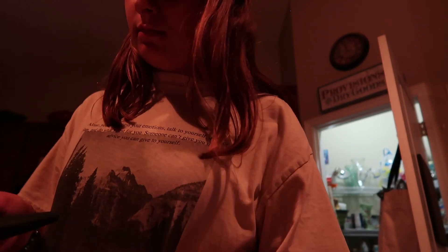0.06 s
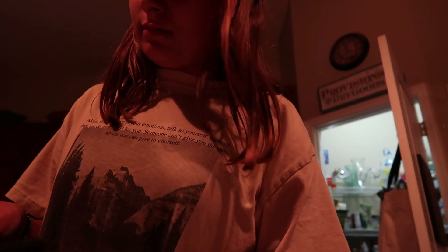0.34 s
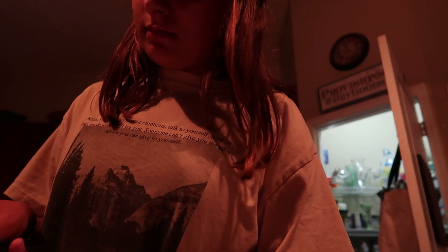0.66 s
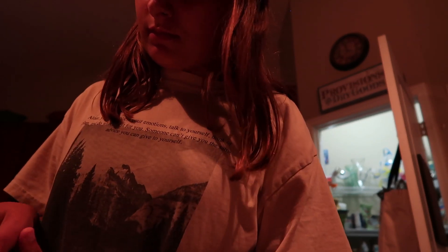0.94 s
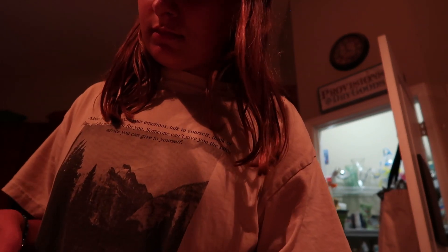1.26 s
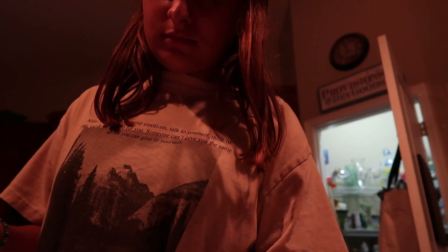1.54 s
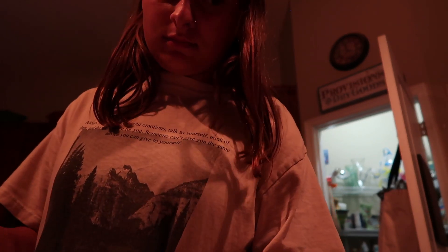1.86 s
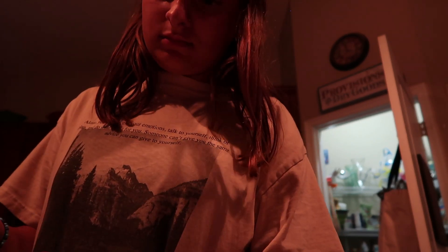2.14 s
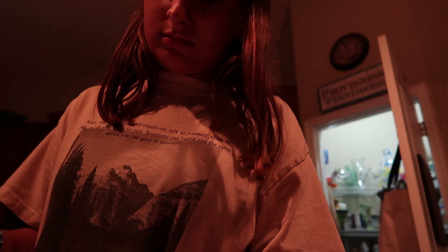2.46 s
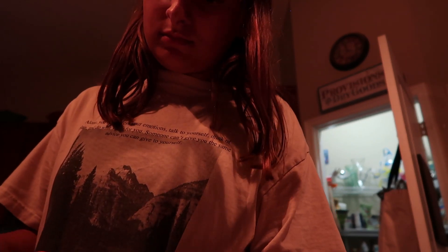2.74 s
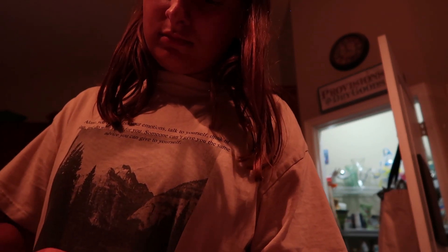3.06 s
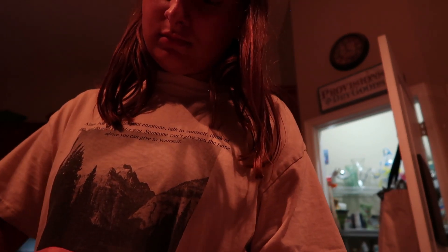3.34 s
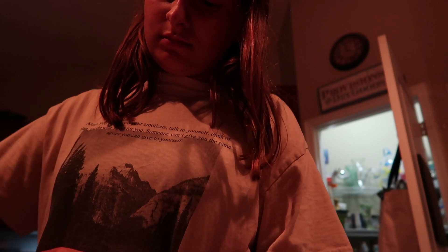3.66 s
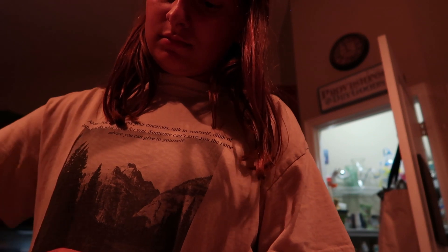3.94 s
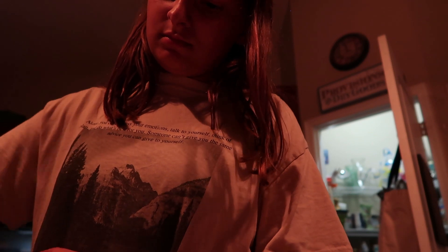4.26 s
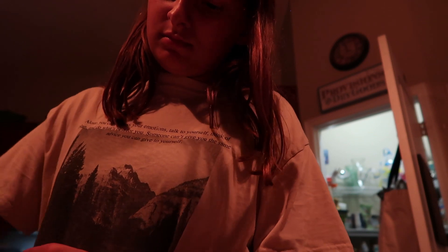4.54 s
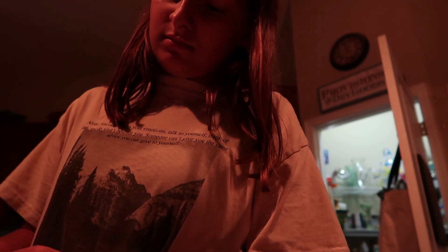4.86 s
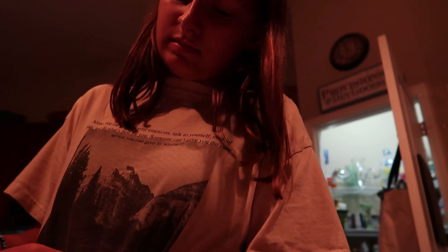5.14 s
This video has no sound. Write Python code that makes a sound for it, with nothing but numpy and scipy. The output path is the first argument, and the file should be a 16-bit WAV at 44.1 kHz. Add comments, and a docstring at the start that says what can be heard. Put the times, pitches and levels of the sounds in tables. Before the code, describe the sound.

A hand can opener grinds unevenly around a tin, with gritty squeaks, metal clicks and sharp knocks on a counter over a faint appliance hum.

```python
"""A small, hard kitchen with an appliance humming: close by, a hand can opener works round a tin on the counter.
Each squeeze drags the cutting wheel along the rim with a gritty scrape and stick-slip squeaks.
The tin judders, rocks and drops back, and the counter booms under it. The steel jaws click on the rim
and once snap shut with a rattle. The walls answer briefly; a limiter ducks after the hardest knocks."""
import sys
import numpy as np
from scipy import signal
from scipy.fft import rfft, irfft
from scipy.io import wavfile
from scipy.ndimage import uniform_filter1d

SR = 44100
rng = np.random.default_rng(int(sys.argv[2]) if len(sys.argv) > 2 else 0)


def unload_wav(signal):
    """Save mono or channel-first audio to the path in sys.argv[1] as 16-bit WAV at rate SR, clipped to [-1, 1]."""
    wavfile.write(
        sys.argv[1],
        SR,
        np.round(np.clip(np.atleast_2d(signal).T, -1, 1) * 32767).astype(np.int16),
    )


N = 233818
TIME = np.arange(N) / SR
TAIL = TIME[:SR * 3 // 4]  # time axis of one hit and its ring-out


def undb(db):
    """Decibels to gain."""
    return 10 ** (np.asarray(db) / 20)


def unit(x):
    """Scale to rms 1."""
    return x / np.sqrt(np.mean(x ** 2) + 1e-18)


def burst(x):
    """Scale a transient to the energy of 10 ms at rms 1."""
    return x / np.sqrt(np.sum(x ** 2) / (SR / 100))


def along(points, hz):
    """Read a curve of (freq_hz, value) points on a log-frequency axis."""
    freq_hz, value = np.transpose(points)
    return np.interp(np.log(np.maximum(hz, 1)), np.log(freq_hz), value)


def colour(x, eq):
    """Shape a sound with an EQ curve."""
    size = x.shape[-1]
    return irfft(rfft(x) * undb(along(eq, np.fft.rfftfreq(size, 1 / SR))), size)


def impulse(eq, size=2048):
    """The tightest click with this spectrum: a minimum-phase pulse."""
    cepstrum = irfft(np.log(undb(along(eq, np.fft.rfftfreq(size, 1 / SR)))))
    cepstrum[1:size // 2] *= 2
    cepstrum[size // 2 + 1:] = 0
    pulse = irfft(np.exp(rfft(cepstrum)))
    return burst(np.pad(pulse, (0, len(TAIL) - size)))


def fade(t60_s):
    """Exponential decay, 60 dB down after t60_s."""
    return np.exp(-np.log(1000) * TAIL / t60_s)


def ring(modes, scatter_db=1.5):
    """Damped modes; each blow lands elsewhere and weights them anew."""
    pitch_hz, level_db, t60_s = np.transpose(modes)[:, :, None]
    weight = undb(level_db + scatter_db * rng.standard_normal(pitch_hz.shape))
    return burst(np.sum(weight * fade(t60_s) * np.sin(2 * np.pi * pitch_hz * TAIL), axis=0))


def ping(hz, cycles=13, overtone=1.4774, overtone_db=-4):
    """A struck part gives a damped note and one overtone."""
    return ring([(hz, 0, cycles / hz), (hz * overtone, overtone_db, cycles / hz / overtone)])


def soften(x, contact_s):
    """The longer a contact lasts, the duller it sounds."""
    push = np.sin(np.pi * TAIL[TAIL < contact_s] / contact_s) ** 2 + 1e-9
    return signal.lfilter(push / push.sum(), 1, x)


def add(track, start_s, sound):
    """Mix a sound into a track at its cue."""
    start = int(start_s * SR)
    part = sound[max(-start, 0):max(N - start, 0)]
    track[max(start, 0):max(start, 0) + len(part)] += part


def stereo_noise(width, size):
    """White noise whose left-right coherence follows a curve."""
    coherence = np.clip(along(width, np.fft.rfftfreq(size, 1 / SR)), -1, 1)
    shares = np.sqrt([(1 + coherence) / 2, (1 - coherence) / 2])
    mid, side = rfft(rng.standard_normal((2, size))) * shares
    return irfft([mid + side, mid - side], size)


# tone of the still air: freq_hz, level_db
AIR_EQ = [(15, -74.5), (25, -30.5), (52, -1), (122, -6), (233, -6.5), (253, -11.5), (289, -7), (331, -9),
          (552, -11), (614, -13), (2300, -21), (2850, -22), (13500, -41), (15500, -73.5)]
# stereo image of the bed, mono in the bass, its hiss unrelated left and right above: freq_hz, coherence
AIR_WIDTH = [(60, 1), (130, 0.712), (290, 0.0067), (700, 0.087), (8000, 0.24)]
# appliance hum: pitch_hz, level_db
HUM_TONES = [(119.5, -58), (150.7, -57.5), (301.5, -70)]


def room_tone(air_db=-52):
    """The bed: still air, soft hiss and an appliance humming."""
    hum = sum(undb(db) * np.sqrt(2) * np.sin(2 * np.pi * (hz * TIME + rng.random()))
              for hz, db in HUM_TONES)
    air = unit(colour(stereo_noise(AIR_WIDTH, N), AIR_EQ))
    return undb(air_db) * air + hum


# how far the right channel trails the left: freq_hz, lag_rad
RIGHT_LAG = [(20, 0), (1000, .08), (2700, .35), (4000, 1.3), (6000, 2.2), (8400, 2.8), (14000, 2.7)]


def pan_left(x, right_db=-3.2):
    """The tin stands to the left, so the right side hears it later and a little weaker."""
    hz = np.fft.rfftfreq(len(x), 1 / SR)
    shadow = undb(along([(150, 0.049), (550, right_db), (3000, right_db), (8000, -0.15)], hz))
    right = irfft(rfft(x) * shadow * np.exp(-1j * along(RIGHT_LAG, hz)), len(x))
    return np.array([x, right])


# reverb time by band: freq_hz, t60_s
ROOM_DECAY = [(150, 0.486), (500, 0.4137), (1200, 0.4494), (2700, 0.4866), (5000, 0.35), (12000, 0.358)]
# stereo image of the tail: freq_hz, coherence
ROOM_WIDTH = [(100, 1), (1400, 0.977), (3100, 0.845), (6500, 0.12), (12000, -0.96)]
# tone of the walls: freq_hz, gain_db
WALL_EQ = [(50, 3), (155, 1.5), (205, -1.5), (270, -0.5), (600, -4), (1300, -4.5), (3000, -3.5),
           (6000, -1.5), (10000, -5), (15000, -7.5)]
# first reflections of the tin: delay_s, level_db
TIN_ECHOES = [(0.0141, 0), (0.0255, -10.5), (0.037, -4.5)]
# first reflections of the snap above it: delay_s, level_db
SNAP_ECHOES = [(0.024, -18.5), (0.024, -8.5), (0.031, -8), (0.034, -25)]


def kitchen_reverb(send, first_echoes, predelay_s=0.00086, build_s=0.0158, diffuse_db=-28.5,
                   early_db=-5, early_t60_s=0.259, echoes_per_s=400):
    """Distinct echoes off cupboards and walls thicken into a short diffuse tail."""
    size = len(TAIL)
    noise = rfft(stereo_noise(ROOM_WIDTH, size))
    hz = np.fft.rfftfreq(size, 1 / SR)
    centres_hz, t60s = np.transpose(ROOM_DECAY)
    bands = [along(np.c_[centres_hz, peak], hz) for peak in np.eye(len(centres_hz))]
    tail = sum(irfft(noise * band, size) * fade(t60_s) for band, t60_s in zip(bands, t60s))
    taps = (rng.random(size) < echoes_per_s / SR) * rng.choice([-1., 1.], size)
    build = np.clip((TAIL - predelay_s) / build_s, 0, 1) * undb(diffuse_db)
    echoes = undb(early_db) * unit(taps) * fade(early_t60_s) * build
    for delay_s, level_db in first_echoes:
        echoes[int(delay_s * SR)] += undb(level_db)
    response = colour(tail * build + pan_left(echoes), WALL_EQ)
    return signal.fftconvolve(send[None], response, axes=1)[:, :N]


def grains(per_s, spread_db):
    """Grit: tiny catches at random moments, a few much larger than the rest."""
    sizes = undb(spread_db * np.minimum(rng.exponential(size=N), 4))
    return (rng.random(N) < per_s / SR) * rng.choice([-1, 1], N) * sizes


def tremor(steps_per_s=14, depth_db=3.5):
    """The wobbling gain of a hand that never presses evenly."""
    hold = int(SR / steps_per_s)
    steps = np.repeat(rng.standard_normal(N // hold + 1), hold)
    return undb(depth_db * uniform_filter1d(steps, hold)[:N])


# dry scrape of steel on the rim: freq_hz, level_db
SCRAPE_EQ = [(250, -6), (700, 2), (1300, 4), (2700, -1.5), (4000, -7.5), (7000, -10.5), (11000, -17.5),
             (16000, -44)]
# low rub of the tin on the counter: freq_hz, level_db
RUB_EQ = [(35, -39.5), (70, 16), (110, 7.5), (160, 3), (205, 6), (270, 7.5), (450, 0.5), (800, -34),
          (2000, -38.5)]
# bright ring of the cutting wheel: pitch_hz, level_db, t60_s
WHEEL_MODES = [(1901, -3.5, 0.27), (1886, -7, 0.1), (2375.4, 4, 0.12), (2889, 0.5, .06), (3087, 1, 0.045),
               (3681, -0.5, 0.13), (4378, -12, 0.063), (4394, -9.5, 0.1), (4730, -13.5, 0.12),
               (5282, -5.5, 0.058), (6410, -6, .04), (6870, -15.5, .09)]
# squeezes of the handles, building up before the start: start_s, build_s, hold_s, scrape_db, rub_db
SQUEEZES = [(0, 0.062, 0.087, -53, -67.5), (0.375, 0.067, 0.371, -58.5, -50),
            (0.843, 0.094, 0.48, -60.5, -47), (1.234, 0.112, 0.077, -52.5, -44),
            (1.624, 0.068, 0.2237, -56, -54), (2.395, 0.071, 0.026, -60.5, -55.5),
            (2.585, 0.071, 0.052, -83.5, -53), (2.946, 0.09, 0.06, -49.5, -44.5),
            (3.495, 0.299, 0.321, -50, -48.5), (4.058, 0.064, 0.688, -53, -41),
            (4.187, 0.027, 0.36, -48, -38), (4.907, 0.136, 0.313, -52, -44)]


def grinding(wheel_db=-11, wheel_t60_s=0.053, release_s=0.1743, idle_rub_db=-58):
    """The wheel grates along the rim, ringing at each catch, while the tin rubs on the counter."""
    scrape_gain = np.zeros(N)
    rub_gain = np.full(N, undb(idle_rub_db))  # the tin always shifts a little under the hand
    for start_s, build_s, hold_s, scrape_db, rub_db in SQUEEZES:
        end_s = start_s + hold_s
        pressure = np.interp(TIME, [start_s - build_s, start_s, end_s, end_s + release_s], [0, 1, 1, 0])
        scrape_gain = np.maximum(scrape_gain, undb(scrape_db) * pressure)
        rub_gain = np.maximum(rub_gain, undb(rub_db) * pressure)
    catches = grains(per_s=900, spread_db=2.5)
    wheel = signal.fftconvolve(catches, ring(WHEEL_MODES) * fade(wheel_t60_s))[:N]
    grit = unit(colour(catches, SCRAPE_EQ)) + undb(wheel_db) * unit(wheel)
    scrape = scrape_gain * tremor() * unit(grit)
    rub = rub_gain * tremor() * unit(colour(grains(per_s=600, spread_db=1.5), RUB_EQ))
    return scrape, rub


def stick_slip(cues, body_modes, contact_s, body_db, jitter, scatter_db, waver):
    """Uneven slips shake a body and ring one resonance, which glides and wavers as the load changes."""
    out = np.zeros(N)
    for start_s, length_s, slips_per_s, start_hz, end_hz, t60_s, level_db in cues:
        gaps, sizes, loads = rng.standard_normal((96, 3)).T
        grip = signal.windows.tukey(int(length_s * SR), 0.232)
        slip_at = ((np.cumsum(np.exp(jitter * gaps)) - .5) * SR / slips_per_s).astype(int)
        inside = (slip_at >= 0) & (slip_at < len(grip))
        slips = np.zeros(len(TAIL))
        slips[slip_at[inside]] = undb(scatter_db * sizes[inside]) * grip[slip_at[inside]]
        glide_hz = np.interp(TAIL, [0, length_s], [start_hz, end_hz])
        pitch_hz = glide_hz * (1 + waver * np.interp(TAIL, slip_at / SR, loads))
        # every slip starts a decaying sine that follows the moving pitch
        carrier = np.exp(2j * np.pi * np.cumsum(pitch_hz) / SR)
        note = np.imag(carrier * signal.fftconvolve(slips / carrier, burst(fade(t60_s)))[:len(TAIL)])
        body = signal.fftconvolve(slips, ring(body_modes))[:len(TAIL)]
        groan = soften(note + undb(body_db) * body, contact_s)
        rms = np.sqrt(np.sum(groan ** 2) / len(grip) + 1e-18)
        add(out, start_s, undb(level_db) * groan / rms)
    return out


# ring of the opener's steel: pitch_hz, level_db, t60_s
STEEL_MODES = [(1187, 3.5, 0.16), (1357, 3, 0.038), (1613.6, 2.5, 0.068), (1990, 9, 0.063),
               (2379, -2, 0.11), (2900, -0.5, 0.06), (3742, 1.5, 0.032), (3940, -11, 0.12),
               (5210, -21.5, 0.079), (6800, -20.5, 0.13)]
# squeaks on the rim: start_s, length_s, slips_per_s, start_hz, end_hz, t60_s, level_db
SQUEAKS = [(0.369, 0.0279, 130, 1294, 854.3, 0.00377, -49), (0.8565, 0.0045, 394.4, 1300, 1150, 0.01, -36),
           (.865, 0.00777, 550, 1500, 1890, 0.0059, -43.5), (1.3585, 0.0041, 558, 2040, 1875, .011, -38.5),
           (1.383, 0.0614, 240, 3670, 3400, 0.0068, -51), (2.08, 0.144, 370, 2750, 2850, 0.043, -67.5),
           (3.5125, 0.0062, 600, 3270, 3570, 0.0053, -41), (3.725, 0.079, 220, 3280, 3100, 0.00607, -56),
           (3.8495, 0.0056, 600, 1470, 1344, 0.0044, -35), (4.1905, 0.0346, 190, 1510, 1200, .007, -44),
           (4.192, 0.054, 230, 2470, 2505, 0.01, -48.5), (4.2445, .006, 600, 2506, 2450, 0.013, -38.5),
           (4.249, 0.012, 230, 1150, 1350, .008, -40), (4.2525, .009, 730, 2570, 2310, .013, -36.5),
           (4.269, 0.016, 330, 1443, 1040, 0.012, -31), (4.272, 0.017, 340, 3380, 3660, 0.016, -46.5),
           (4.2825, 0.0043, 690, 2400, 2366, 0.017, -37.5), (4.358, 0.031, 160, 1250, 1920, 0.0036, -41),
           (4.476, 0.047, 140, 1900, 1900, 0.0042, -46), (4.722, 0.0367, 270, 2333, 2540, 0.022, -54.5),
           (4.933, 0.0157, 400, 1390, 1460, 0.014, -48), (4.96, 0.273, 380, 3230, 3150, 0.0221, -60),
           (5.108, 0.0145, 260, 1690, 2000, 0.0082, -49)]


def wheel_squeaks():
    """The wheel bites into the rim in hard, ragged slips: a gritty squeak."""
    return stick_slip(SQUEAKS, STEEL_MODES, contact_s=0.0001, body_db=-11.5,
                      jitter=0.35, scatter_db=2.5, waver=0.019)


# hollow body of the tin: pitch_hz, level_db, t60_s
TIN_MODES = [(171.7, 1.5, 0.14), (236.8, -4, 0.502), (301.2, 5, 0.124), (307.7, 7, 0.072),
             (353, 5.5, 0.085), (369.4, 10.5, 0.1506), (465.5, 10.5, 0.04), (522.93, 0.5, 0.32),
             (713.4, -2, 0.091), (748.2, -1, 0.16), (864.3, -7.5, 0.16)]
# judders on the counter: start_s, length_s, slips_per_s, start_hz, end_hz, t60_s, level_db
JUDDERS = [(.443, 0.0157, 165, 350, 305, 0.0185, -21.5), (0.492, 0.031, 225, 231, 210.7, 0.033, -31.5),
           (.552, 0.0494, 210, 224, 202, 0.058, -42), (1.284, 0.0273, 170, 435, 500, 0.0166, -40.5),
           (1.398, 0.0572, 125, 245, 277, 0.0168, -34.5), (3.517, 0.0207, 275, 332, 255, 0.0305, -20.5),
           (4.105, 0.0221, 250, 301, 298, 0.0168, -32), (4.1905, 0.0193, 105, 404.5, 453, 0.0263, -20.5),
           (4.2085, 0.026, 146, 504.3, 539, 0.049, -21), (4.243, 0.036, 150, 254.5, 312, 0.049, -32),
           (4.247, 0.041, 190, 767, 757, 0.0375, -35), (4.357, 0.033, 170, 470, 558, 0.0146, -27),
           (4.44, 0.031, 200, 315, 387, 0.021, -33.5), (4.884, 0.0217, 200, 295, 378, 0.014, -39),
           (4.929, 0.303, 244, 233.5, 234.3, 0.18, -45.5), (5.068, 0.101, 227, 259, 234.4, 0.035, -40.5)]


def tin_judders():
    """The tin sticks and slips on the counter in soft, nearly even pushes: a low groan."""
    return stick_slip(JUDDERS, TIN_MODES, contact_s=0.001127, body_db=-16.5,
                      jitter=0.09, scatter_db=2.0, waver=0.014)


def metal_contact(eq, chatter_db, chatter_t60_s, steel_db):
    """Metal meets metal: one pulse, a brief chatter of loose parts, a damped ring."""
    chatter = burst(colour(rng.standard_normal(len(TAIL)), eq) * fade(chatter_t60_s))
    return burst(impulse(eq) + undb(chatter_db) * chatter + undb(steel_db) * ring(STEEL_MODES))


def add_skid(track, hit_s, hit_db, swell_s=0.0117, grit_db=-36.5, db_per_hit_db=0.421):
    """Metal skids into and out of a contact with a swell of grit; light touches are mostly grit."""
    middle_s = TAIL[len(TAIL) // 2]
    swell = np.exp(-np.abs(TAIL - middle_s) / swell_s)
    grit = burst(colour(rng.standard_normal(len(TAIL)), SCRAPE_EQ) * swell)
    add(track, hit_s - middle_s, undb(grit_db + db_per_hit_db * hit_db) * grit)


# bright tick of a sharp edge: freq_hz, level_db
EDGE_EQ = [(800, 14), (2800, -4), (4500, 6), (7000, -3), (10000, 1), (13000, -9), (15000, -44)]
# the wheel chatters against the rim: start_s, ring_db, tick_db
CLINKS = [(1.0316, -35, -37.5), (1.0333, -31.5, -42.5)]


def wheel_clinks(damped_t60_s=0.0121, free_db=-19):
    """The wheel glances off the rim: damped at first, it comes free and rings on faintly."""
    out = np.zeros(N)
    for start_s, ring_db, tick_db in CLINKS:
        tick = metal_contact(EDGE_EQ, chatter_db=23.5, chatter_t60_s=0.0324, steel_db=-22)
        damped = burst(ring(WHEEL_MODES) * fade(damped_t60_s))
        free = undb(free_db) * ring(WHEEL_MODES)
        add(out, start_s, undb(ring_db) * (damped + free) + undb(tick_db) * tick)
    return out


def rebound(blow, count=3, gap_s=0.0065, bounce_db=-15.5, contact_s=0.000353):
    """The tin rocks on its base: a blow comes back inverted, weaker and duller each time."""
    out = blow
    for _ in range(count):
        delayed = np.pad(blow, (int(gap_s * SR), 0))[:len(blow)]
        blow = -undb(bounce_db) * soften(delayed, contact_s)
        out = out + blow
    return out


def tin_knock(full_force_hz, level_db, hz_per_db=5.5, punch_t60_s=0.0118, body_db=-6):
    """The struck spot gives a short punch, lower for lighter blows; the whole tin rings on."""
    punch = rebound(ring([(full_force_hz + hz_per_db * level_db, 0, punch_t60_s)]))
    return undb(level_db) * burst(punch + undb(body_db) * ring(TIN_MODES))


# boom of the counter top: pitch_hz, level_db, t60_s
COUNTER_MODES = [(68.3, 8.5, 0.145), (104.83, -0.5, 0.742), (163.6, -7, 0.28)]


def counter_thud(pitch_hz, t60_s=0.244, boom_db=-5, thump_hz=120, thump_t60_s=0.0492, thump_db=-5):
    """The counter gives a short thump and booms on under the tin."""
    low_note = ring([(pitch_hz, 0, t60_s)])
    boom = undb(boom_db) * ring(COUNTER_MODES)
    thump = undb(thump_db) * ring([(thump_hz, 0, thump_t60_s)])
    return burst(low_note + boom + thump)


# midrange click of a blow on the tin: freq_hz, level_db
CLICK_EQ = [(200, -50.5), (550, 9), (780, 8), (1150, 15.5), (2300, 5), (3600, 2), (4300, -6), (8000, -41),
            (15000, -57.5)]
# the tin lands on the counter: start_s, knock_db, clack_db, clack_hz, contact_s, thud_db, thud_hz
DROPS = [(0.8632, -33.5, -48, 922, 0.00069, -18.5, 101.2), (0.8659, -32, -34, 1286, 0.000429, -52, 98),
         (1.035, -35, -36.5, 710, 0.00026, -22, 70.6), (1.1611, -36, -37.5, 513, 0.000534, -32.5, 81.6),
         (1.1675, -37.5, -36.5, 835, 0.000577, -28.5, 84.8), (1.3917, -30, -39.5, 709, 0.000255, -46, 71.6),
         (2.61, -49, -73.5, 720, 0.0003, -37.5, 68.6), (2.84, -57, -83, 720, 0.00024, -40.5, 71),
         (3.5446, -14, -17.5, 672.6, 0.000392, -15, 79.8), (3.727, -31.5, -47.5, 599, 0.00031, -25, 76.1),
         (3.8501, -26, -28.5, 723, 0.0006, -19.5, 75.5), (4.27, -22.5, -33.5, 752, 0.00057, -19.5, 77.8),
         (4.288, -26, -37.5, 715, 0.00077, -20, 74.8), (4.3733, -31, -35, 725, 0.000274, -19.5, 76.6),
         (4.385, -26.5, -47.5, 604, 0.00037, -35, 78), (4.5292, -9.5, -11.5, 709, 0.000377, -14.5, 76.7),
         (4.716, -51.5, -48, 600, .0005, -23, 75.5), (4.753, -35, -43, 584, 0.00041, -25, 73),
         (5.1498, -26.5, -39, 687, 0.000883, -20.5, 79.3)]


def tin_drops(base_hz=508, ping_db=2, send_db=-11, knock_lag_s=0.000536, thud_lag_s=0.00173):
    """The tin rocks and drops back: its base clacks dully, its body rings, the counter booms."""
    close, send = np.zeros((2, N))
    for start_s, knock_db, clack_db, clack_hz, contact_s, thud_db, thud_hz in DROPS:
        metal = metal_contact(CLICK_EQ, chatter_db=8.0, chatter_t60_s=0.014, steel_db=-18.5)
        knock = tin_knock(base_hz, knock_db)
        strike = burst(metal + undb(ping_db) * ping(clack_hz))
        clack = undb(clack_db) * rebound(soften(strike, contact_s))
        add_skid(close, start_s, clack_db)
        add(close, start_s, clack)
        add(close, start_s + knock_lag_s, knock)
        add(close, start_s + thud_lag_s, undb(thud_db) * counter_thud(thud_hz))
        add(send, start_s, undb(send_db) * (clack + knock))
    return close, send


def loose_rattle(start_s, count=13, length_s=0.055, level_db=-26, fall_db=1, low_hz=561.5, high_hz=3016):
    """Handles, rivet and wheel knock against each other, each knock with its own short note."""
    out = np.zeros(N)
    for k, (offset, note) in enumerate(rng.random((count, 2))):
        progress = (k + offset) / count
        pitch_hz = low_hz * (high_hz / low_hz) ** note
        tink = ping(pitch_hz, cycles=24.5, overtone=1.57, overtone_db=-19.5)
        add(out, start_s + progress * length_s, undb(level_db - fall_db * progress) * tink)
    return out


# crack of the jaws, heard straight on: freq_hz, level_db
SNAP_EQ = [(60, -37), (130, -3.5), (220, -8), (450, 10.5), (800, 1.5), (1700, -3), (2900, 5), (3900, 2.5),
           (5500, -1), (8000, -9), (11000, -15), (15000, -17.5)]
# extra colour as the crack spreads into the room: freq_hz, gain_db
SNAP_SEND_EQ = [(60, 6), (200, 11), (450, -4), (800, 5.5), (1700, 10.5), (3000, -1), (5500, -1.5),
                (9000, -7), (15000, -5)]
# the catch, then the snap: start_s, level_db
SNAPS = [(1.4731, -20), (1.4769, -9)]


def jaw_snap():
    """The jaws catch, then spring shut with a bright crack in the air above the counter."""
    close, send = np.zeros((2, N))
    for start_s, level_db in SNAPS:
        add_skid(close, start_s, level_db)
        crack = metal_contact(SNAP_EQ, chatter_db=11.0, chatter_t60_s=0.0174, steel_db=-13.5)
        add(close, start_s, undb(level_db) * crack)
        add(send, start_s, undb(level_db) * impulse(SNAP_EQ))
    return close, colour(send, SNAP_SEND_EQ)


# the steel jaws hit the rim: start_s, click_db, ping_hz, edge_db, knock_db
JAW_HITS = [(0.1286, -63.5, 1310, -50, -32), (0.1336, -37.5, 3117, -37, -38),
            (0.4207, -39.5, 2040, -38, -30.5), (0.4277, -38, 1850, -43.5, -30),
            (0.4307, -37, 1230, -32.5, -28.5), (0.4365, -28.5, 2030, -24.5, -12.5),
            (0.443, -30, 1820, -46, -23.5), (.877, -47.5, 1400, -58.5, -28),
            (1.1601, -57.5, 2300, -64.5, -46.5), (1.444, -37.5, 1890, -57.5, -39.5),
            (3.0224, -11, 2052, -40, -1), (3.0217, -24.5, 2759, -53.5, -34),
            (3.5145, -30, 1955, -46.5, -20.5), (3.9219, -43, 1890, -54.5, -34.5),
            (4.5043, -35.5, 2050, -43.5, -26), (4.5298, -25, 2386, -38, -46),
            (4.711, -45, 2140, -62.5, -41)]


def jaw_hits(rim_hz=358.7, ping_db=5, wheel_db=-13, thud_hz=88, thud_vs_knock_db=-14.5,
             knock_lag_s=0.00066, thud_lag_s=0.00254,
             click_send_db=-14, edge_send_db=-8, knock_send_db=-11):
    """Each hit clicks, its sharp edge wakes the wheel, the tin rings and then the counter shakes."""
    close, send = np.zeros((2, N))
    for start_s, click_db, ping_hz, edge_db, knock_db in JAW_HITS:
        metal = metal_contact(CLICK_EQ, chatter_db=31.5, chatter_t60_s=0.0232, steel_db=-12.5)
        note = ping(ping_hz, cycles=25.3, overtone=1.294, overtone_db=-10.5)
        click = undb(click_db) * burst(metal + undb(ping_db) * note)
        tick = metal_contact(EDGE_EQ, chatter_db=16.0, chatter_t60_s=0.0085, steel_db=6)
        edge = undb(edge_db) * burst(tick + undb(wheel_db) * ring(WHEEL_MODES))
        knock = tin_knock(rim_hz, knock_db)
        add_skid(close, start_s, click_db)
        add(close, start_s, click + edge)
        add(close, start_s + knock_lag_s, knock)
        add(close, start_s + thud_lag_s, undb(knock_db + thud_vs_knock_db) * counter_thud(thud_hz))
        add(send, start_s, undb(click_db + click_send_db) * metal)
        add(send, start_s, undb(edge_send_db) * edge + undb(knock_send_db) * knock)
    return close, send


def scene(room_lean_db=0.9):
    """The mix: close work on the tin, placed left, over its reverb and the room tone."""
    hits, hit_send = jaw_hits()
    drops, drop_send = tin_drops()
    snap, snap_send = jaw_snap()
    clinks = wheel_clinks() + loose_rattle(start_s=SNAPS[-1][0])
    judders = tin_judders()
    squeaks = wheel_squeaks()
    scrape, rub = grinding()
    close = hits + drops + snap + clinks + judders + squeaks + scrape + rub
    tin_send = (hit_send + drop_send + undb(-8) * clinks + undb(-9.5) * judders
                + undb(-9) * (scrape + squeaks))
    reverb = kitchen_reverb(tin_send, TIN_ECHOES) + kitchen_reverb(undb(-4.5) * snap_send, SNAP_ECHOES)
    lean_left = undb([[room_lean_db], [-room_lean_db]])
    return pan_left(close) + reverb * lean_left + room_tone()


def record(dry, ceiling=1.241, release_db_per_s=14, low_cut_hz=56, high_cut_hz=15700):
    """The master chain: low cut, a limiter that ducks fast and recovers slowly, soft clip, high cut."""
    sound = signal.sosfilt(signal.butter(4, low_cut_hz, "high", fs=SR, output="sos"), dry)
    over_db = 20 * np.log10(np.maximum(np.abs(sound).max(axis=0) / ceiling, 1))
    recovery_db = release_db_per_s * TIME
    duck_db = np.maximum.accumulate(over_db + recovery_db) - recovery_db
    duck_db = uniform_filter1d(np.roll(duck_db, -32), size=64)  # smooth attack with look-ahead
    limited = sound * undb(-duck_db)
    rounded = limited / (1 + limited ** 10) ** (1 / 10)
    return signal.sosfilt(signal.ellip(8, .2, 70, high_cut_hz, fs=SR, output="sos"), rounded)


dry = scene()
out = record(dry)
unload_wav(out)
```